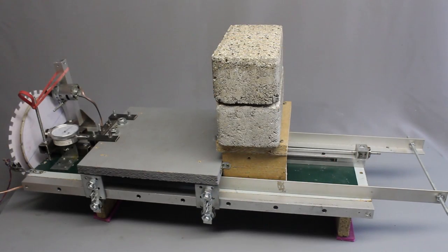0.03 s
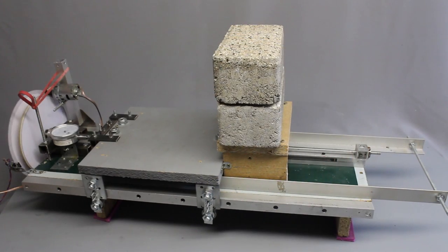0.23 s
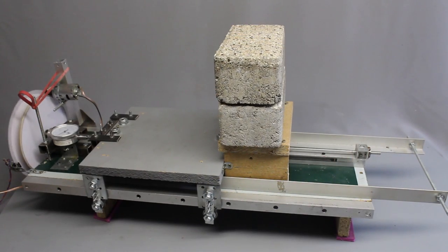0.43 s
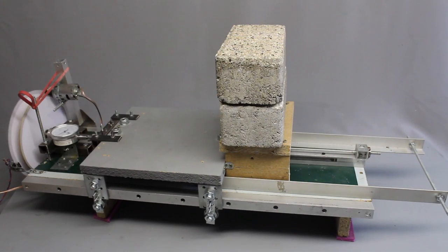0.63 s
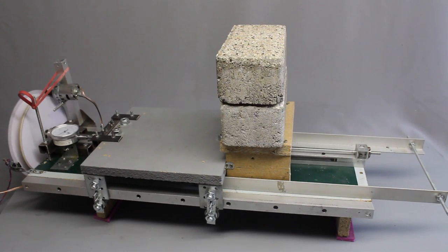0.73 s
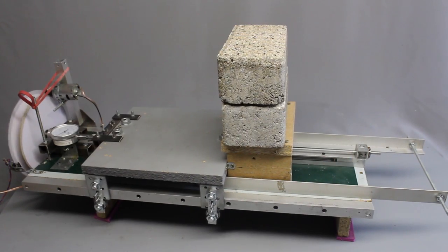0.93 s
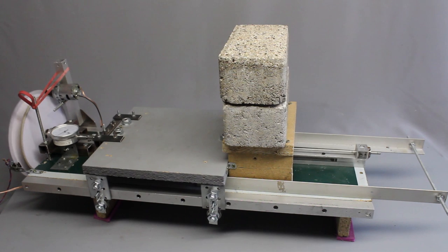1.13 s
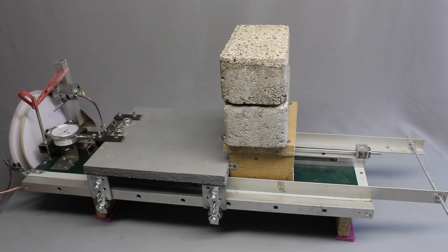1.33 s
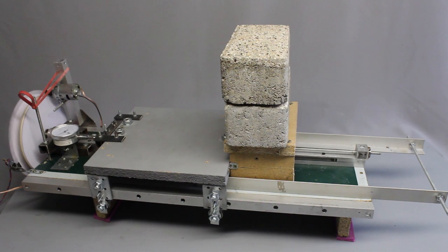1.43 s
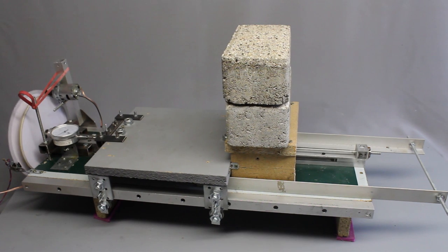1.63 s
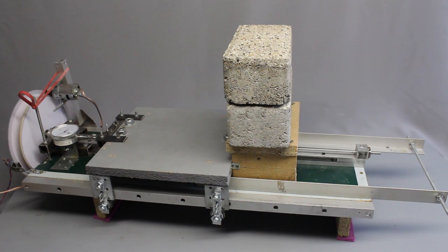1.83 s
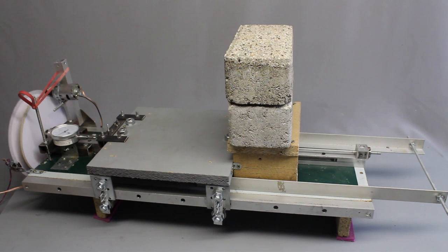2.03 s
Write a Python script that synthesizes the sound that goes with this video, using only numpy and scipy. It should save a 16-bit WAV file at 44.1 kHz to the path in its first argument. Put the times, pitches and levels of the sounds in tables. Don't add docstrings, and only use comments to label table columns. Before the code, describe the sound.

Electric gear motor whirr with a coarse metallic rattle and rhythmic rod scrapes, in a quiet workshop

```python
import sys
import numpy as np
from scipy import signal
from scipy.fft import rfft, irfft
from scipy.io import wavfile
from scipy.ndimage import uniform_filter1d

SR = 44100
rng = np.random.default_rng(int(sys.argv[2]) if len(sys.argv) > 2 else 0)


def persist_wave(psi):
    counts = np.round(np.clip(psi, -1, 1) * 32767).astype(np.int16)
    wavfile.write(sys.argv[1], SR, np.atleast_2d(counts).T)


def volts_from_decibels(level):
    exponent = np.asarray(level, float) / 20
    return 10 ** exponent


N = 91728
START_S = 0.1

# [freq_hz, level_db_per_hz]
ROOM_SPECTRUM = [(35, -35), (60, -3.5), (1110, 1), (1220, -1), (1980, -4), (2330, -1), (4700, -10),
                 (10900, -6), (15800, -11)]
# [centre_hz, width_hz, level_db]
SUPPLY_CASE = [(2300, 40, -81), (15600, 100, -91), (3090, 70, -83), (11900, 30, -88), (13600, 1500, -83)]
# [start_s, peak_db, pitch_hz, width_share_of_pitch]
BACKLASH_KNOCKS = [(.0988, -49, 8000, .15), (.141, -45, 3430, .04), (.157, -49, 9500, .7),
                   (.122, -49, 2300, .15), (.156, -43, 2100, .12), (.493, -52, 10500, .1),
                   (.613, -54, 10800, .2), (.83, -55, 12700, .5), (.843, -53, 12000, .6),
                   (1.129, -51, 12000, .6), (1.46, -54, 11000, .3), (1.57, -56, 12500, .5),
                   (1.608, -52, 12200, .6), (1.806, -56, 11000, .4), (1.93, -55, 11500, .5),
                   (1.98, -56, 11000, .5)]
PASS_TIMES_S = [0.103, 0.146, 0.252, .675, 1.21, 1.757, 2.078]
PASS_ANGLE_TURNS = [-.3, 0, 1, 5, 10, 15, 18]
# [centre_hz, width_hz, level_db]
FRAME_MODES = [(313.7, 20, -16.5), (380.6, 9.8, -8.5), (456, 53, -15.5), (512.2, 9.2, -2), (593.8, 16.7, 1),
               (660, 11.8, -0.5), (746, 28.7, -0.5), (824.8, 17, -0.5), (920, 34, -4), (1029, 34, -10),
               (1081, 50, -9), (1301.6, 25.5, -7), (1421, 47, -12)]
# [centre_hz, width_hz, level_db]
GEARBOX_MODES = [(1544, 42, -1), (1736, 56, -11.5), (1703, 19, -3), (1946, 5.5, 0.5), (2083, 85, -5),
                 (2100, 85, 2.5), (2240, 35, 2), (2410, 11, -10), (2424, 22, 1.5), (2982, 74, -4.5),
                 (3284, 160, -10.5)]
# [centre_hz, width_hz, level_db]
BRACKET_MODES = [(4240, 40, -2), (5120, 220, -10), (6070, 500, -8.5), (6660, 80, -8), (7590, 130, -6),
                 (8630, 95, -3.5), (10450, 150, -4.5), (12200, 60, -7)]
# [position_turns, length_turns, level_db]
FRAME_LOAD_SWINGS = [
    (.32, .07, 2.8),
    (.6, .06, 1.5),
    (.85, .05, -2),
]
# [position_turns, length_turns, level_db]
SLACK_SWINGS = [
    (.86, .055, -6),
    (.13, .04, -3),
    (.36, .04, -3),
]
# [freq_hz, level_db_per_hz]
GRIND_SPECTRUM = [(24, -53), (40, -24), (248, -16.5), (747, -7), (1200, -13.5), (2140, -1), (3520, -13),
                  (6110, -14.5), (15800, -22.5)]
# [position_turns, length_turns, centre_hz, width_hz, level_db]
TIGHT_SPOTS = [
    (-.015, .04, 6200, 1200, -49.5),
    (.01, .045, 5150, 600, -54.5),
    (.01, .035, 2150, 220, -45),
]
# [position_turns, length_turns, centre_hz, width_hz, level_db]
ROD_RUBS = [
    (.5, .045, 4800, 1800, -54),
    (.51, .035, 8650, 450, -54.5),
    (.57, .05, 7100, 1500, -52.5),
            (.25, .03, 6900, 1600, -56), (.12, .03, 7700, 400, -61), (.49, .035, 4000, 900, -54),
             (.47, .04, 5900, 1200, -54.5), (.66, .04, 5900, 1600, -56), (.46, .03, 11800, 3500, -60.5),
             (.29, .04, 10300, 1500, -62), (.71, .05, 1650, 500, -49), (.47, .035, 3000, 500, -53),
             (.3, .04, 2450, 300, -53), (.64, .04, 12500, 4000, -62)]
# [multiple, level_db, fade_db_per_s]
CHOPPER_HARMONICS = [
    (1, -57, -1),
    (2, -56, -4),
]
# [multiple_of_turn_rate, level_db]
ROD_ORDERS = [(4, -102), (5, -83), (6, -112), (7, -86.5), (8, -69.5), (11, -77), (13, -78), (14, -72),
              (16, -79), (34.5, -69)]
# [start_s, peak_db, pitch_hz]
FRAME_CATCHES = [(0.151, -32, 577), (0.198, -30, 746), (0.262, -31.5, 732), (0.374, -29, 725),
                 (0.417, -37, 735), (0.475, -41, 770), (0.52, -31, 756), (0.587, -35, 648),
                 (0.655, -34, 590), (0.696, -35, 773), (0.736, -29, 743), (0.771, -31.5, 599),
                 (0.838, -34, 748), (0.911, -31, 595), (0.958, -32.5, 591), (1.024, -33, 600),
                 (1.097, -33, 819), (1.139, -33, 599), (1.169, -31, 650), (1.232, -31, 736),
                 (1.318, -37, 745), (1.386, -39, 648), (1.423, -36, 595), (1.507, -34.5, 773),
                 (1.559, -33, 604), (1.607, -32, 664), (1.677, -27.5, 606), (1.82, -34, 746),
                 (1.996, -35, 837), (2.045, -38, 644),
                 (.166, -29, 750),
    (0.32, -32.5, 600),
    (.163, -36, 520),
    (0.29, -32, 760),
]
# [start_s, peak_db, pitch_hz]
GEARBOX_CATCHES = [(0.1848, -34, 2180), (0.2212, -31.5, 2453), (0.3579, -35, 2160), (0.3988, -32, 2264),
                   (0.4642, -31, 2167), (0.5694, -37, 2130), (0.6727, -33, 2127), (0.767, -28, 2066),
                   (0.8109, -33, 2210), (0.8433, -36, 2110), (0.8872, -37, 2140), (0.991, -34, 2120),
                   (1.0992, -36, 2133), (1.2808, -38, 2140), (1.3207, -43, 2110), (1.432, -34, 2080),
                   (1.5148, -40, 2196), (1.6096, -35, 2190), (1.647, -37, 2155), (1.6804, -29.5, 2260),
                   (1.7313, -36, 2230), (1.7617, -39, 2180), (1.8066, -36, 2260), (1.8879, -35, 2270),
                   (1.9278, -31, 2090), (1.9992, -41, 2130)]


def clock_s():
    return np.arange(N) / SR


def rms_one(x):
    return x / np.sqrt(np.mean(x ** 2) + 1e-20)


def drift(rate_hz):
    r = np.exp(-2 * np.pi * rate_hz / SR)
    wander = signal.lfilter([1], [1, -2 * r, r * r], rng.standard_normal(N + SR))
    return rms_one(wander[SR:])


def resonance(x, centre_hz, width_hz):
    r = np.exp(-np.pi * width_hz / SR)
    zeros = np.array([1, 0, -1]) * (1 - r * r) / 2
    poles = [1, -2 * r * np.cos(2 * np.pi * centre_hz / SR), r * r]
    return signal.lfilter(zeros, poles, x)


def coloured_noise(spectrum):
    hz, db = np.transpose(spectrum)
    bin_hz = np.arange(N // 2 + 1) * SR / N + 1
    gain = volts_from_decibels(np.interp(np.log(bin_hz), np.log(hz), db))
    return rms_one(irfft(rfft(rng.standard_normal(N)) * gain, N))


def load_db(turns, swings):
    total_db = 0
    for position, length, db in swings:
        offset = (turns - position + .5) % 1 - .5
        total_db = total_db + db * np.exp(-.5 * (offset / length) ** 2)
    return total_db


def room():
    return volts_from_decibels(-70) * coloured_noise(ROOM_SPECTRUM)


def supply():
    mains_buzz_hz, chirp_share = 100.03, 0.34
    from_hz, to_hz, echo_s = 8800, 12700, 0.00059
    half_cycles = clock_s() * mains_buzz_hz + 0.061
    x = half_cycles % 1 / chirp_share
    cycles = chirp_share / mains_buzz_hz * (from_hz * x + (to_hz - from_hz) * x * x / 2)
    envelope = np.sin(np.pi * np.clip(x, 0, 1)) ** .5 * (x < 1)
    chirp = envelope * np.sin(2 * np.pi * cycles)
    chirp = chirp * volts_from_decibels(1.5 * (half_cycles % 2 < 1))
    echoes = np.roll(chirp, int(echo_s * SR)) + np.roll(chirp, int(3.3 * echo_s * SR))
    chirp = chirp + volts_from_decibels(-7) * echoes
    tick = (np.diff(x, prepend=0) < 0) + 0.042 * rng.standard_normal(N)
    case = sum(volts_from_decibels(db) * rms_one(resonance(tick, hz, width_hz)) for hz, width_hz, db in SUPPLY_CASE)
    return volts_from_decibels(-72.5) * rms_one(chirp) + case


def knocks():
    t60_s, crack_db, length = .04, -9, 4000
    out, t = np.zeros(N + SR), np.arange(length) / SR
    for start_s, db, hz, width_share in BACKLASH_KNOCKS:
        noise = rng.standard_normal(length)
        ring = rms_one(resonance(noise, hz, width_share * hz))
        crack = volts_from_decibels(crack_db) * hz / 10000 * np.diff(noise, prepend=0)
        i = int(start_s * SR)
        out[i:i + length] += volts_from_decibels(db - 60 * t / t60_s) * (ring + crack)
    return out[:N]


def teeth():
    contacts_per_s, spread_db = 3000, 2
    sizes = volts_from_decibels(spread_db * np.minimum(rng.exponential(1, N), 4)) * rng.choice([-1, 1], N)
    return rms_one(sizes * (rng.random(N) < contacts_per_s / SR))


def body(modes, level_db):
    waver_db, even_share = .8, .6
    hits = teeth()
    sound = np.zeros(N)
    for k, (hz, width_hz, db) in enumerate(modes):
        sound += (-1) ** k * volts_from_decibels(db + waver_db * drift(5.5)) * resonance(hits, hz, width_hz)
    sound = rms_one(sound)
    local_power = uniform_filter1d(sound ** 2, size=700)
    return volts_from_decibels(level_db) * rms_one(sound / np.sqrt(local_power + even_share))


def grind():
    return volts_from_decibels(-45 + 1.4 * drift(55.0)) * coloured_noise(GRIND_SPECTRUM)


def rubs(turns):
    vary_db = 1.2
    out = np.zeros(N)
    for position, length, hz, width_hz, db in TIGHT_SPOTS + ROD_RUBS:
        lap = turns - position + length
        x = (lap % 1) / length
        lap_index = np.clip(lap + 2, 0, 39).astype(int)
        strength = volts_from_decibels(vary_db * rng.standard_normal(40))[lap_index]
        scrape = resonance(rng.standard_normal(N), hz, width_hz)
        scrape = resonance(scrape, hz, 2 * width_hz)
        local_power = uniform_filter1d(scrape ** 2, size=300)
        scrape = rms_one(scrape / np.sqrt(local_power + 1.9 * np.mean(scrape ** 2)))
        envelope = (x * np.exp(1 - x)) ** 2
        out += volts_from_decibels(db) * strength * envelope * scrape
    return out


def chopper():
    chopper_hz, t = 490.0, clock_s()
    out = np.zeros(N)
    for multiple, db, fade_db_per_s in CHOPPER_HARMONICS:
        level_db = db + 3 + fade_db_per_s * t + 1.8 * drift(7)
        out += volts_from_decibels(level_db) * np.sin(2 * np.pi * (multiple * chopper_hz * t + rng.random()))
    return out


def drive(turns):
    spin_up_s, start_loss_db = 0.075, -13.5
    since_start_s = clock_s() - START_S
    on = np.clip(since_start_s / 0.012, 0, 1)
    slow = np.clip(1 - since_start_s / spin_up_s, 0, 1)
    loss_db = start_loss_db * slow
    frame_load_db = load_db(turns, FRAME_LOAD_SWINGS)
    slack_db = load_db(turns, SLACK_SWINGS)
    mix = body(FRAME_MODES, -42) * volts_from_decibels(1.5 * loss_db + frame_load_db)
    mix += body(GEARBOX_MODES, -47) * volts_from_decibels(loss_db + .5 * slack_db)
    mix += body(BRACKET_MODES, -57) * volts_from_decibels(2.5 * loss_db + slack_db)
    mix += grind() * volts_from_decibels(0.83 * loss_db + 0.33 * slack_db)
    mix += rubs(turns) * volts_from_decibels(2 * loss_db)
    mix += chopper() * volts_from_decibels(2 * slow)
    return on * mix


def hum(turns):
    out = np.zeros(N)
    for multiple, db in ROD_ORDERS:
        level = volts_from_decibels(db + 5 + 1.2 * drift(4))
        out += level * np.sin(2 * np.pi * (multiple * turns + rng.random()))
    return out


def mesh(turns):
    teeth_per_turn, peak_turns = 40.5, .22
    swell = np.cos(np.pi * (turns - peak_turns))
    return volts_from_decibels(-50.5 + drift(2)) * swell * np.sin(2 * np.pi * teeth_per_turn * turns)


def leg():
    leg_hz, peak_s, span_s = 192.1, 1.43, 0.18
    swell_db = 7.5 * np.exp(-.5 * ((clock_s() - peak_s) / span_s) ** 2)
    return volts_from_decibels(-69 + swell_db + 0.64 * drift(2)) * np.sin(2 * np.pi * leg_hz * clock_s())


def shake(turns):
    delay_s, rise_s = .025, .03
    bite = np.clip((clock_s() - START_S - delay_s) / rise_s, 0, 1)
    return bite * (hum(turns) + mesh(turns) + leg())


def surges():
    frame_rise_s, gear_rise_s, length = 0.0065, .0035, 3000
    out, t = np.zeros(N + SR), np.arange(length) / SR
    rows = [(s, db, hz, frame_rise_s) for s, db, hz in FRAME_CATCHES]
    rows += [(s, db - 1, hz, gear_rise_s) for s, db, hz in GEARBOX_CATCHES]
    for start_s, db, hz, rise_s in rows:
        swell = t / rise_s * np.exp(1 - t / rise_s)
        tone = np.sin(2 * np.pi * (hz * t + rng.random()))
        i = int(start_s * SR)
        out[i:i + length] += volts_from_decibels(db - 6.5) * swell * tone
    return out[:N]


def scene():
    turns = np.interp(clock_s(), PASS_TIMES_S, PASS_ANGLE_TURNS)
    mix = room() + supply() + knocks() + drive(turns) + shake(turns) + surges()
    return mix[None]


def band_limit(x):
    return signal.sosfilt(signal.butter(12, 16480, fs=SR, output="sos"), x)


def record(dry):
    low_pass = signal.ellip(12, .5, 70, 15720, fs=SR, output="sos")
    mix = signal.sosfilt(low_pass, dry)
    return band_limit(mix)


dry = scene()
out = record(dry)
persist_wave(out)
```